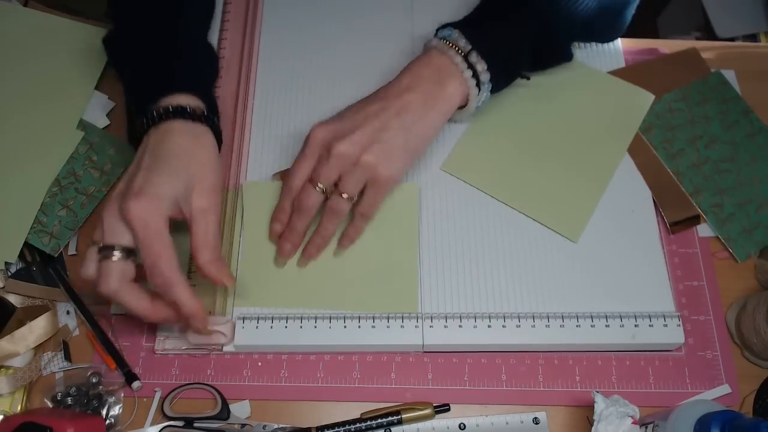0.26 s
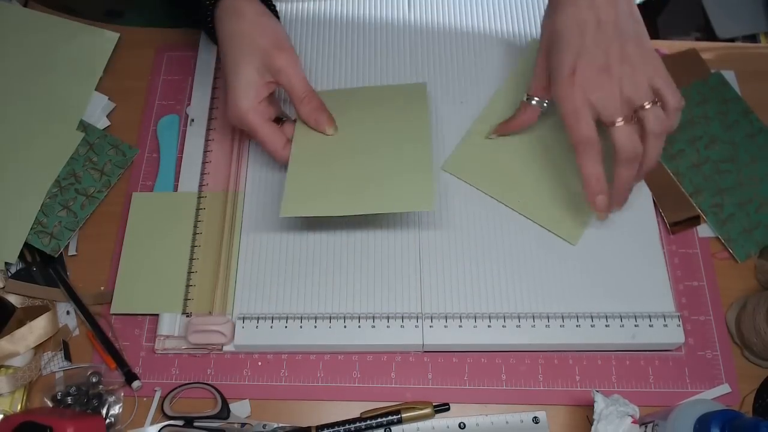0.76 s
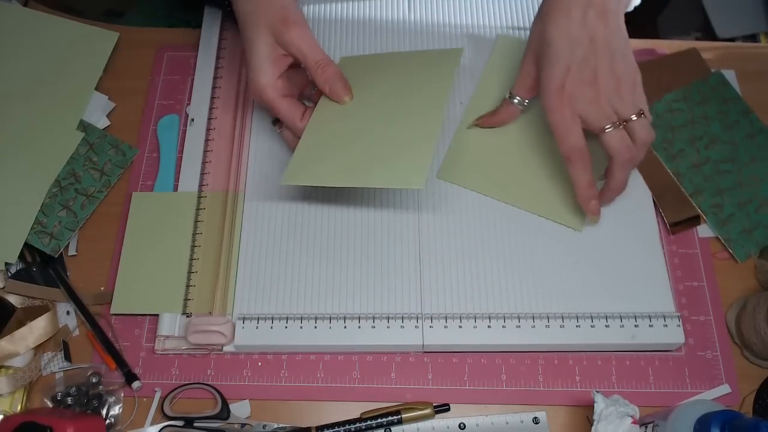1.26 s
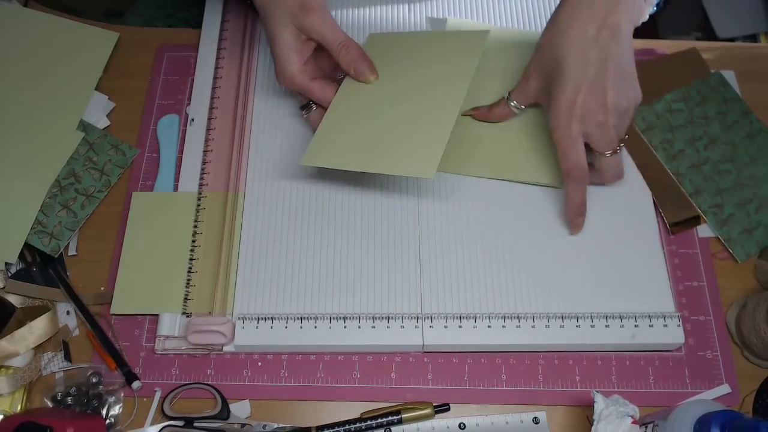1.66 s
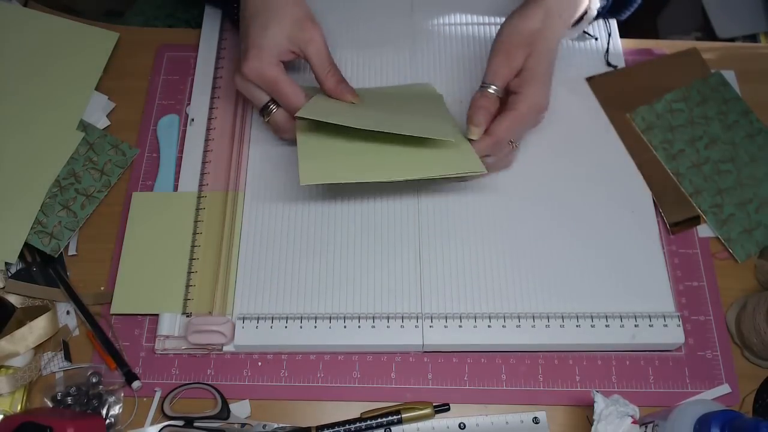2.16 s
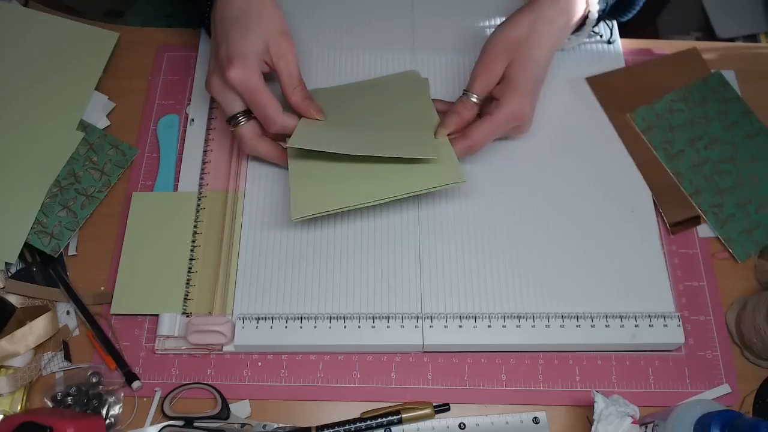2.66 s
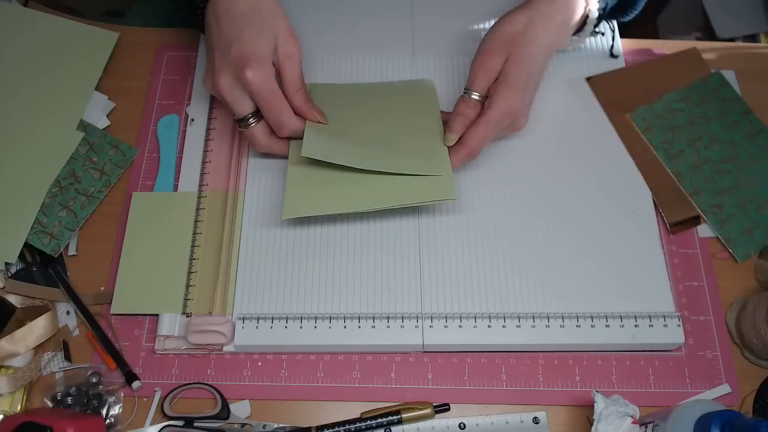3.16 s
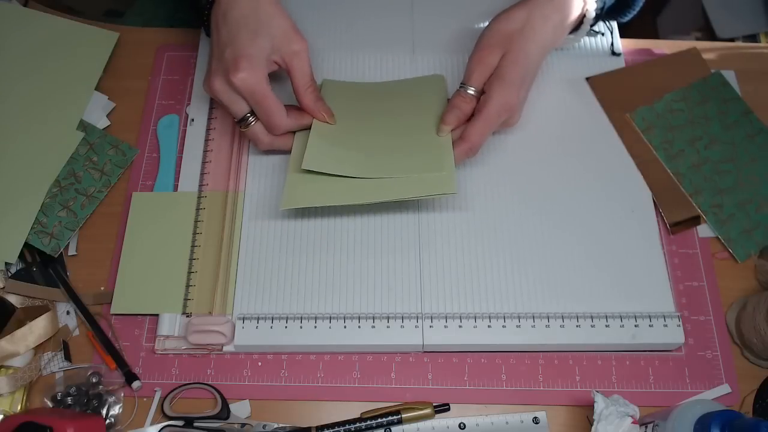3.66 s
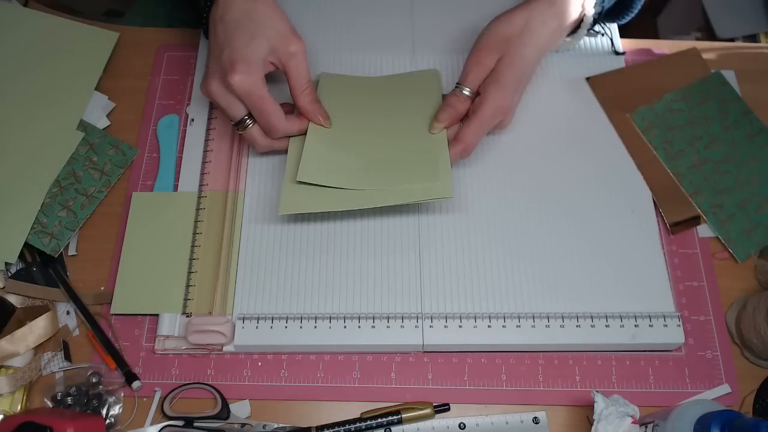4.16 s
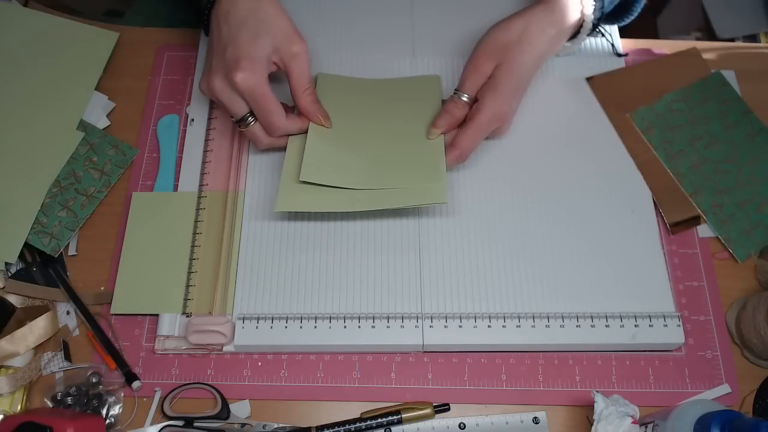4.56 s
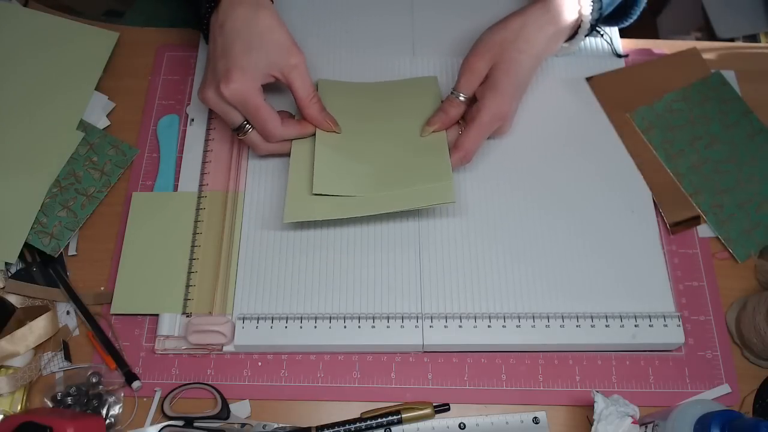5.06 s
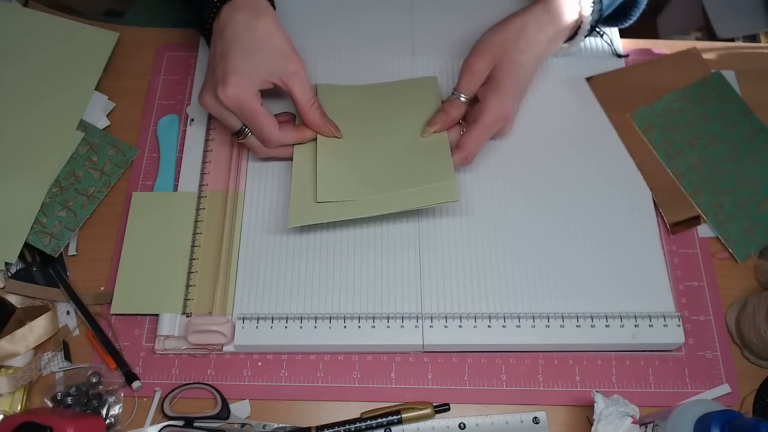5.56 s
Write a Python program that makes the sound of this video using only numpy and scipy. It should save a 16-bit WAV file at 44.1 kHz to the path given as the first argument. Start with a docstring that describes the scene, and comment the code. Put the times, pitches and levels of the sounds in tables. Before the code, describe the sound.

Cardstock scrapes out of a plastic paper trimmer with clicks and hollow knocks, then sheets slide together with soft swishes and ticks.

```python
"""Cardstock on a paper trimmer

Close up, in a small, quiet room with a mains hum. The guide rail is flicked up, the cut card grates
out from under it, and fingers and card knock on the hollow plastic base, ringing its modes.
Then the sheets are slid over each other and squared up in the hands: fibres catch and slip
in soft hisses and quick swishes, and the edges tick."""
import sys
import numpy as np
from scipy import signal
from scipy.fft import rfft, irfft, next_fast_len
from scipy.io import wavfile

SR = 44100
rng = np.random.default_rng(int(sys.argv[2]) if len(sys.argv) > 2 else 0)


def wav_record(signal):
    """Record a signal, one row per channel, as 16-bit PCM in the file named by sys.argv[1]."""
    frames = np.transpose(np.atleast_2d(signal))
    bounded = np.clip(frames, -1, 1)
    # unit amplitude maps onto the largest positive 16-bit level
    quanta = np.round(bounded * 32767).astype(np.int16)
    wavfile.write(sys.argv[1], SR, quanta)


N = 256655
TIME = np.arange(N) / SR

# mains hum and fan whine: pitch_hz, level_db
HUM_TONES = [(99.6, -55.5), (126.5, -72.5), (941, -82)]
# EQ curves, each with columns frequency_hz, gain_db
ROOM_EQ = [(20, 6), (50, 3), (90, 0.5), (130, 0.5), (180, -8.5), (250, -14.5), (380, -17.5), (800, -21),
           (1300, -23), (2200, -29.5), (4000, -39.5), (8000, -51.5)]     # room rumble
FACE_EQ = [(2200, -16), (3300, -5.5), (4100, 1), (5050, 4.5), (5700, 2.5), (6300, -4.5), (7000, -2),
           (7700, -11.5), (8400, -24)]     # bright hiss off the card's face
SHEET_EQ = [(1000, -2.5), (1320, -8), (1600, -1.5), (1850, 4.5), (2050, 2), (2380, 5.5), (2900, 0.5),
            (3300, -10.5), (4200, -45)]   # midrange of the bending sheet
RUB_EQ = [(50, 4.5), (110, 2), (230, 2), (340, -4), (420, -7), (580, -15.5), (760, -1.5), (920, -1.5),
          (1150, -5), (1350, -28.5)]       # low rub through the base
SNAP_EQ = [(300, -25), (850, 10.5), (1100, 10), (1320, -1.5), (1700, 11), (2700, 1), (3150, 0.5),
           (3600, -1.5), (5500, -2), (7500, -8.5), (8400, -38.5)]     # snap of a card edge
# faint hiss of card shifting in the fingers as the hands settle: time_s, level_db
HOLDING_HISS = [(0, -65.5), (1.4, -68), (2.9, -67.5), (3.85, -74.5), (5.5, -83)]
# card gliding over card: start_s, length_s, hiss_db, swell_db (start to end), bend_db (re the hiss)
CARD_SLIDES = [(0.142, 0.11, -45.5, -1, -1), (0.261, 0.091, -55, -3.5, -6), (0.447, 0.076, -58.5, 14, 0.5),
               (0.661, 0.28, -58.5, 5, -3), (0.964, 0.048, -51.5, 2, -9), (1.107, 0.19, -63, 4.5, 5),
               (1.322, 0.068, -51.5, 2, -5.5), (1.403, 0.17, -54.5, 12, 0), (1.6, 0.18, -48, -9.5, -2),
               (1.767, 0.22, -61, 11.5, 2.5), (2.048, 0.13, -59, 24, -2.5), (2.198, 0.14, -57.5, 5.5, 1.5),
               (2.583, .14, -68.5, -2, 8.5), (2.924, 0.1, -57, -5.5, -3.5), (3.023, 0.13, -53, -2, -6.5),
               (3.202, 0.25, -59.5, -11.5, -5.5), (3.645, 0.029, -65.5, 4, -19),
               (3.714, 0.062, -65, 5, -7.5), (3.924, 0.12, -65.5, -2.5, -2.5), (4.081, .13, -58.5, 0, -3.5),
               (4.364, 0.038, -63, 8, 1), (4.552, 0.14, -68.5, -7, 5), (4.783, 0.29, -73, -10, 3.5),
               (5.1, 0.063, -73, 0, 4), (5.565, 0.29, -80.5, -8, 2.5)]
# card and fingertips dragged over the base: start_s, length_s, level_db, swell_db (start to end)
BASE_DRAGS = [(0.12, 0.082, -53, -12), (0.26, 0.48, -65, -12.5), (0.77, 0.25, -62.5, -16),
              (1.2, 0.17, -58.5, -2), (1.335, 0.66, -57, -4), (2.1, 0.13, -75, -6), (2.42, 0.067, -60.5, 8),
              (4.555, 0.14, -65.5, -2), (5.65, 0.13, -70, 8)]
# blows on the base: start_s, table_thump_db, flex_db, hollow_clack_db, edge_snap_db
BASE_KNOCKS = [(0.002, -37, -43, -46.5, -48), (0.044, -39, -56, -41, -48), (0.122, -70, -44.5, -38, -33.5),
               (0.4402, -49.5, -66.5, -45, -49), (0.534, -53, -42.5, -42.5, -38.5),
               (0.547, -56, -48, -29.5, -35.5), (0.586, -59, -43.5, -43, -37),
               (0.724, -31, -40.5, -38, -37.5), (0.747, -42, -38, -42.5, -41.5),
               (0.825, -43, -55, -53, -65), (1.077, -32.5, -34.5, -33.5, -35),
               (1.143, -48, -37.5, -30, -37.5), (1.159, -41, -37, -33.5, -40.5),
               (1.2001, -40.5, -49.5, -44.5, -48), (1.3745, -70, -62, -47, -50.5),
               (1.5477, -46.5, -39.5, -35, -39.5), (1.628, -70, -56, -41, -50),
               (1.825, -61.5, -45, -52, -50.5), (2.0383, -39.5, -39.5, -45, -57.5),
               (2.1995, -52.5, -55.5, -65, -43), (2.878, -63, -63, -63, -62),
               (4.448, -59, -54.5, -49.5, -56.5), (4.592, -50.5, -60, -65, -59),
               (4.652, -42, -57.5, -57, -66)]
# ring of the base lying on its table: pitch_hz, level_db, t60_s
BASE_MODES = [(64.3, -8, 0.35), (88.7, 2, 0.19), (123, 2, 0.18), (167.5, 1, 0.2), (233.6, 3, 0.086),
              (317, -4, 0.12), (364.3, -2, 0.09), (445, -4, 0.094), (504, -5, 0.097), (554, -6.5, 0.099),
              (623, -5.5, 0.082), (687, 3, 0.037), (752.5, 0, 0.085), (835.5, -0.5, 0.048),
              (918, -2, 0.041), (1037, -12, 0.07)]
# snaps of card corners and edges: start_s, level_db, brightness_hz
EDGE_SNAPS = [(0.046, -43.5, 2720), (0.247, -44.5, 2000), (0.6306, -46.5, 2500), (0.709, -43.5, 4000),
              (0.808, -48, 3000), (0.829, -53.5, 2700), (0.851, -43.5, 3940), (0.898, -56.5, 4500),
              (0.9685, -46.5, 4860), (1.095, -47, 4200), (1.117, -56, 4200), (1.492, -47, 3200),
              (1.581, -44.5, 2800), (1.872, -53, 6000), (2.056, -51.5, 2330), (2.395, -54, 2540),
              (2.66, -55.5, 3600), (3.2194, -53, 3100), (3.38, -58, 2800), (4.221, -61, 2500),
              (4.306, -57.5, 3630), (4.4173, -52.5, 4200), (4.497, -59.5, 1900), (4.515, -58, 1800),
              (4.525, -59, 1800), (5.030, -62, 2450), (5.2835, -63, 2280), (5.292, -63, 2200),
              (5.387, -61, 2000), (5.4175, -66.5, 2200), (5.618, -60, 2200), (5.717, -63.5, 4800),
              (5.775, -60.5, 2200), (5.808, -61.5, 3000)]
# air pushed by hand and card: start_s, length_s, level_db
AIR_PUFFS = [(0.013, 0.11, -40), (0.871, 0.12, -51.5), (1.201, .13, -51)]
# hard clicks of plastic and fingernails: start_s, level_db, brightness_hz, width_hz
HARD_CLICKS = [(0.1136, -29, 3900, 2600), (0.123, -39.5, 3900, 2580), (4.5452, -39, 2670, 1490)]
# their short ring: pitch_hz, level_db, t60_s
CLICK_MODES = [(1865, -5, 0.018), (2470, -3.5, 0.017), (2800, -1.5, 0.023), (3440, -0.5, 0.011),
               (4160, -2, 0.011), (5330, 1, 0.0065)]
# resonances of the card grating under the rail: centre_hz, width_hz, level_db, swells_towards_s
# (the highest band is still rising when the scrape cuts off)
SCRAPE_BANDS = [(676, 300, -43.5, 0.15), (1740, 450, -45.5, 0.205), (2850, 400, -46, 0.27)]
# quick pulls of sheet along sheet: start_s, rise_s, fall_s, level_db, centre_hz, width_hz, overtone_db
SHEET_SWISHES = [(0.984, 0.022, 0.006, -44, 2460, 1480, 24), (1.129, 0.011, 0.0045, -38.5, 2700, 1590, -13),
                 (1.606, 0.028, 0.054, -32, 2380, 517, -1), (1.65, 0.051, 0.056, -40.5, 2550, 1160, -1.5),
                 (1.958, 0.0388, 0.005, -38, 2530, 1860, 9), (2.412, 0.016, 0.11, -40.5, 2720, 1270, -2),
                 (2.441, 0.021, 0.049, -43.5, 2500, 1350, 0), (4.388, 0.0174, 0.018, -54, 2480, 1400, 10)]

EDGE_HZ = 3800   # brightness of a striking edge, and the middle of the crinkles' range


def from_db(db):
    """Decibels to gain."""
    return 10 ** (np.asarray(db) / 20)


def unit_rms(x):
    """Scale to rms 1."""
    return x / np.sqrt(np.mean(x ** 2) + 1e-20)


def drift(rate_hz):
    """A random wobble of rms 1 that takes a new turn rate_hz times a second."""
    knots = rng.standard_normal(4000)
    return unit_rms(np.interp(TIME * rate_hz, np.arange(len(knots)), knots))


def equalise(x, curve):
    """Minimum-phase EQ along a curve, so nothing rings ahead of a hit."""
    size = next_fast_len(2 * len(x), True)
    hz, db = np.transpose(curve)
    grid = np.maximum(np.fft.rfftfreq(size, 1 / SR), 1)
    gain = from_db(np.interp(np.log(grid), np.log(hz), db))
    cepstrum = irfft(np.log(gain), size)
    cepstrum[1:size // 2] *= 2
    cepstrum[size // 2 + 1:] = 0
    return irfft(rfft(x, size) * np.exp(rfft(cepstrum)), size)[:len(x)]


def resonate(x, hz, width_hz):
    """Two-pole resonance with unity gain at its peak."""
    r = np.exp(-np.pi * width_hz / SR)
    feedback = [1, -2 * r * np.cos(2 * np.pi * hz / SR), r * r]
    return signal.lfilter((1 - r * r) / 2 * np.array([1, 0, -1]), feedback, x)


def steep_band(x, hz, width_hz):
    """The same resonance twice, for steeper skirts."""
    return resonate(resonate(x, hz, width_hz), hz, width_hz)


def decay(t, t60):
    """Exponential fade that loses 60 dB in t60 seconds."""
    return np.exp(-np.log(1000) * t / t60)


def add(out, start_s, sound):
    """Mix a sound in at start_s."""
    at = max(round(start_s * SR), 0)
    out[at:at + len(sound)] += sound[:N - at]


def friction(per_s, spread_db, smooth, size):
    """Fibres catch and let go: tiny slips of uneven size over a smooth hiss."""
    sizes = from_db(spread_db * np.minimum(rng.exponential(1, size), 4)) * rng.choice([-1, 1], size)
    slips = sizes * (rng.random(size) < per_s / SR)
    return unit_rms(unit_rms(slips) + smooth * rng.standard_normal(size))


def contact(t, t60, crack):
    """A sharp crack on the front of a dying burst of noise."""
    burst = rng.standard_normal(len(t)) * decay(t, t60)
    burst /= np.linalg.norm(burst)
    burst[0] += crack
    return burst


def strokes(rows, attack_s=0.014, release_t60_s=0.1):
    """Envelope of hand strokes: each gets the card moving, swells or fades, and comes to rest."""
    power = np.zeros(N)
    for start_s, length_s, db, swell_db in rows:
        t = TIME - start_s
        attack = np.clip(t / attack_s, 0, 1)
        hold = from_db(db + swell_db * (np.clip(t / length_s, 0, 1) - 0.5))
        release = decay(np.maximum(t - length_s, 0), release_t60_s)
        power += (attack * hold * release) ** 2
    return np.sqrt(power)


def room_tone(rumble_db=-57.5, waver_db=1.5):
    """A bed of low rumble under gently wavering mains hum and fan whine."""
    hum = np.zeros(N)
    for hz, db in HUM_TONES:
        gain = np.sqrt(2) * from_db(db + waver_db * drift(4.026))
        hum += gain * np.sin(2 * np.pi * (hz * TIME + rng.random()))
    return hum + from_db(rumble_db) * unit_rms(equalise(rng.standard_normal(N), ROOM_EQ))


def sliding(flutter_db=2.1, face_db=-1.38, sheet_db=-0.55, rub_db=4.5):
    """One stream of slips hisses off the card's face, shakes the sheet and drums on the base."""
    held = from_db(np.interp(TIME, *np.transpose(HOLDING_HISS)))
    hiss_gain = np.hypot(strokes([row[:4] for row in CARD_SLIDES]), held)
    bends = [(start, length, db + bend_db, swell) for start, length, db, swell, bend_db in CARD_SLIDES]
    bend_gain = np.hypot(strokes(bends), held)
    slips = friction(per_s=3200, spread_db=2.0, smooth=1.0, size=N)
    slips *= from_db(flutter_db * drift(110))
    face = unit_rms(equalise(slips, FACE_EQ)) * from_db(face_db) * hiss_gain
    sheet = unit_rms(equalise(slips, SHEET_EQ)) * from_db(sheet_db) * bend_gain
    rub = unit_rms(equalise(slips, RUB_EQ)) * from_db(rub_db) * strokes(BASE_DRAGS)
    return face + sheet + rub + crinkles(hiss_gain)


def crinkles(hiss_gain, per_s=24, relative_db=-10, spread_db=4.5):
    """Edges catch at random as the card moves: tiny snaps that ride the level of the hiss."""
    catches = []
    for when, size, pitch in rng.random((round(per_s * N / SR), 3)):
        hiss_db = 20 * np.log10(hiss_gain[int(when * N)])
        accent_db = spread_db * min(-np.log(1 - size), 2)
        catches.append((when * N / SR, hiss_db + relative_db + accent_db, EDGE_HZ * 2 ** (pitch - 0.5)))
    return snaps(catches)


def knocks(thump_top_hz=180, flex_top_hz=520, clack_span_hz=260, flex_lift_db=5.0, clack_lift_db=4.5,
           uneven_db=0.84, rattle=0.5, detune=0.022):
    """Each blow rings the base's modes, a little differently at each spot; the loose base rattles."""
    out, t = np.zeros(N), TIME[:SR // 2]
    for start_s, thump_db, flex_db, clack_db, _ in BASE_KNOCKS:
        blow = np.zeros(len(t))
        clack_hz = 730 + 12.5 * (clack_db - flex_db)   # a stiffer spot flexes less and clacks higher
        for hz, mode_db, t60 in BASE_MODES:
            if hz < thump_top_hz:
                drive_db = thump_db
            elif hz < flex_top_hz:
                drive_db = flex_db + flex_lift_db
            else:   # the struck spot favours the modes near its clack
                off_centre = 2 * (hz - clack_hz) / clack_span_hz
                drive_db = clack_db + clack_lift_db - 10 * np.log10(1 + off_centre ** 2)
            pitch_hz = hz * (1 + detune * rng.normal())
            tone = -np.sin(2 * np.pi * (pitch_hz * t + 0.12 * rng.normal()))
            chatter = unit_rms(resonate(rng.standard_normal(len(t)), hz, hz / 9))
            envelope = (1 - np.exp(-3.6 * hz * t)) * decay(t, t60)   # builds within the first cycle
            gain = from_db(drive_db + mode_db + uneven_db * rng.normal())
            blow += gain * (tone + rattle * chatter) * envelope
        add(out, start_s, blow)
    return signal.sosfilt(signal.butter(4, 1300, fs=SR, output="sos"), out)


def snaps(rows, typical_t60_s=0.033, width_hz=3200, body=0.16, lift_db=0.5):
    """A card edge cracks and buzzes briefly through a broad resonance."""
    out, t = np.zeros(N), TIME[:SR // 10]
    for start_s, db, hz in rows:
        t60 = typical_t60_s * np.exp(0.53 * rng.normal())
        buzz = contact(t, t60, crack=0.46)
        snap = equalise(resonate(buzz, hz, width_hz) + body * buzz, SNAP_EQ)
        snap *= np.sqrt(0.01 * SR / np.sum(snap ** 2))   # the energy of 10 ms at rms 1
        add(out, start_s, from_db(db + lift_db) * snap)
    return out


def reflections(x, t60=0.079, wet_db=-12.5, gap_s=0.0037):
    """The table's clutter and near walls return a short, weak tail."""
    t = TIME[:SR // 2]
    fade_in = np.clip(t / gap_s - 1, 0, 1)
    tail = rng.standard_normal(len(t)) * decay(t, t60) * fade_in
    return from_db(wet_db) * signal.fftconvolve(x, tail / np.linalg.norm(tail))[:N]


def puffs(hz=42, width_hz=30):
    """Air pushed towards the microphone makes a soft, deep swell."""
    out = np.zeros(N)
    for start_s, length_s, db in AIR_PUFFS:
        swell = np.hanning(round(length_s * SR))
        air = steep_band(rng.standard_normal(SR), hz, width_hz)[-len(swell):]
        add(out, start_s, from_db(db) * unit_rms(air * swell))
    return out


def clicks(snap_mix=0.23):
    """A hard contact and its tiny rebounds ring a few short, high modes."""
    out, t = np.zeros(N), TIME[:SR // 10]
    modes = sum((-1) ** k * from_db(db) * np.sin(2 * np.pi * hz * t) * decay(t, t60)
                for k, (hz, db, t60) in enumerate(CLICK_MODES))
    for start_s, db, hz, width_hz in HARD_CLICKS:
        hit = contact(t, t60=0.014, crack=0.62)
        ring = resonate(signal.fftconvolve(hit, modes)[:len(t)], hz, width_hz)
        click = unit_rms(ring) + snap_mix * unit_rms(equalise(hit, SNAP_EQ))
        click *= np.sqrt(0.01 * SR / np.sum(click ** 2))   # the energy of 10 ms at rms 1
        add(out, start_s, from_db(db) * click)
    return out


def scrape(start_s=0.125, end_s=0.219):
    """The cut edge grates out from under the rail; its resonances take over from one another."""
    out = np.zeros(N)
    grit = friction(per_s=450, spread_db=-0.5, smooth=0.5, size=N)
    for hz, width_hz, db, swells_towards_s in SCRAPE_BANDS:
        envelope = np.sqrt(np.interp(TIME, [start_s, swells_towards_s, end_s], [0, 1, 0]))
        out += from_db(db) * envelope * unit_rms(steep_band(grit, hz, width_hz))
    return out


def swishes(top_db=-5.5, top_hz=6700, pitch_bend=0.0686, scratch_db=1.0):
    """Fast, scratchy friction sings in the gap between sheets: a broad resonance with two overtones."""
    out, t = np.zeros(N), TIME[:SR // 4]
    for start_s, rise_s, fall_s, db, hz, width_hz, overtone_db in SHEET_SWISHES:
        slips = friction(per_s=2600, spread_db=2.0, smooth=0.7, size=len(t))
        slips *= from_db(scratch_db * drift(305)[:len(t)])
        voice = np.zeros(len(t))
        for k, partial_db in enumerate((0, overtone_db, overtone_db + top_db), 1):
            partial = steep_band(slips, min(hz * k, top_hz), width_hz * k ** 0.054)
            voice += from_db(partial_db) * unit_rms(partial)
        ramp = np.interp(t, [0, rise_s, rise_s + fall_s], [0, 1, 0])
        speed = np.sin(np.pi / 2 * ramp) ** 2.06
        warped_time = np.cumsum(1 + pitch_bend * (speed - 0.8)) / SR   # pitch rises with speed
        voice = np.interp(warped_time, t, voice)
        add(out, start_s, from_db(db) * unit_rms(voice) * speed)
    return signal.sosfilt(signal.butter(4, 7100, fs=SR, output="sos"), out)


def scene():
    """Card and trimmer up front, with close reflections, puffs of air and room tone, in mono."""
    striking_edges = [(start_s, snap_db, EDGE_HZ) for start_s, *_, snap_db in BASE_KNOCKS]
    foley = sliding() + scrape() + swishes() + knocks() + snaps(EDGE_SNAPS + striking_edges) + clicks()
    return (foley + reflections(foley) + puffs() + room_tone())[None]


def record(dry):
    """A small microphone that rolls off the deepest bass and cuts the top steeply."""
    low_cut = signal.butter(2, 29, "high", fs=SR, output="sos")
    high_cut = signal.ellip(10, 0.3, 80, 7950, fs=SR, output="sos")
    return signal.sosfilt(high_cut, signal.sosfilt(low_cut, dry))


dry = scene()
out = record(dry)
wav_record(out)
```